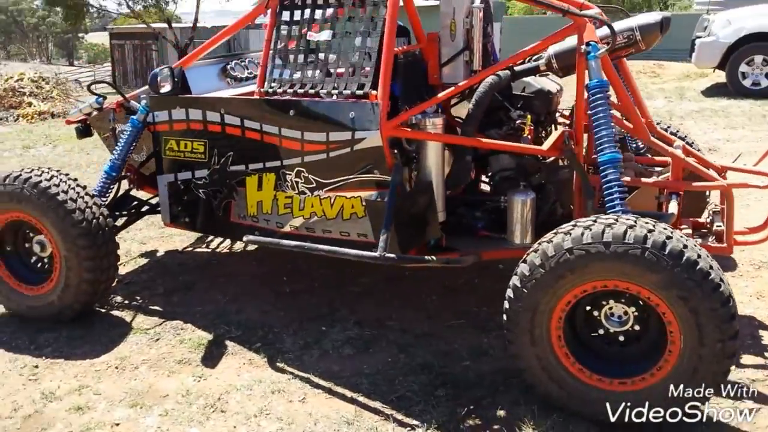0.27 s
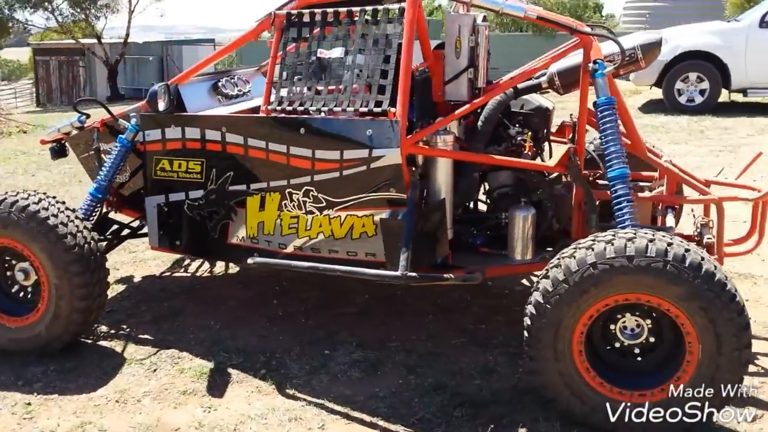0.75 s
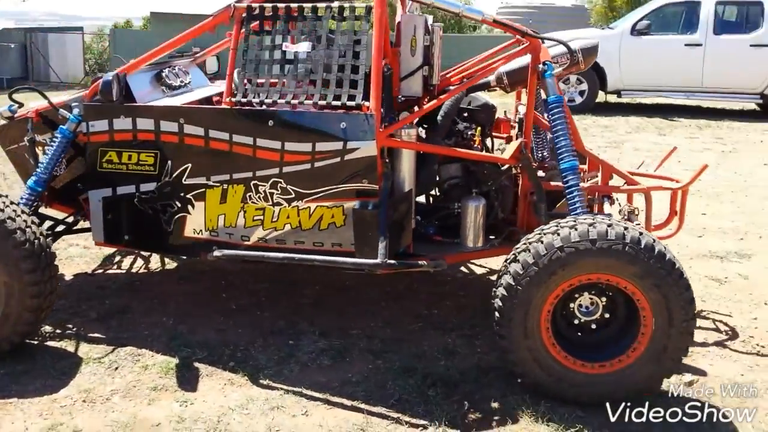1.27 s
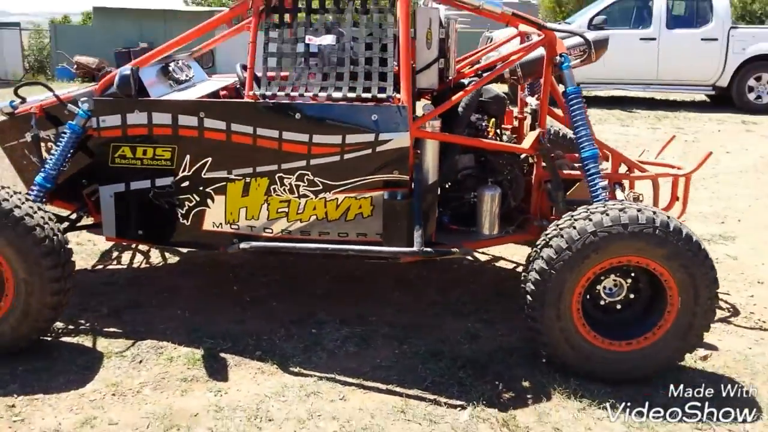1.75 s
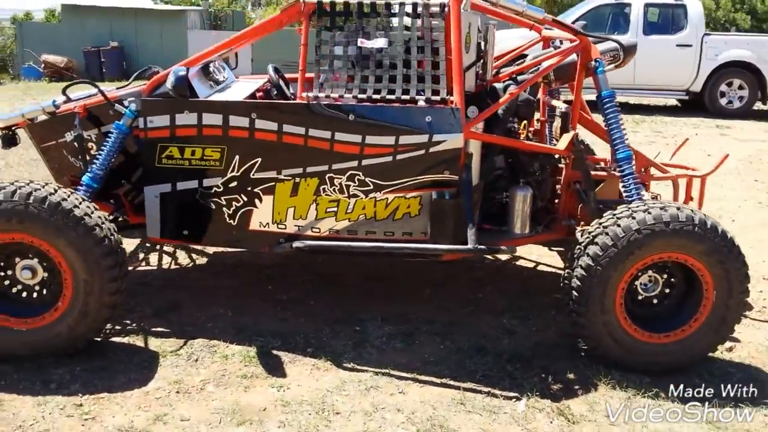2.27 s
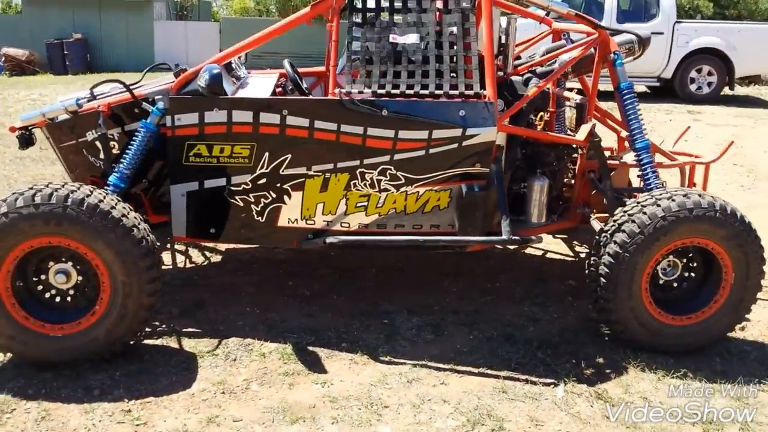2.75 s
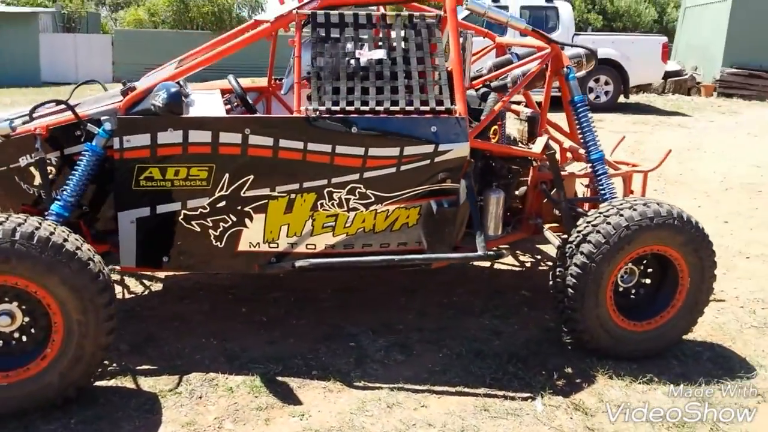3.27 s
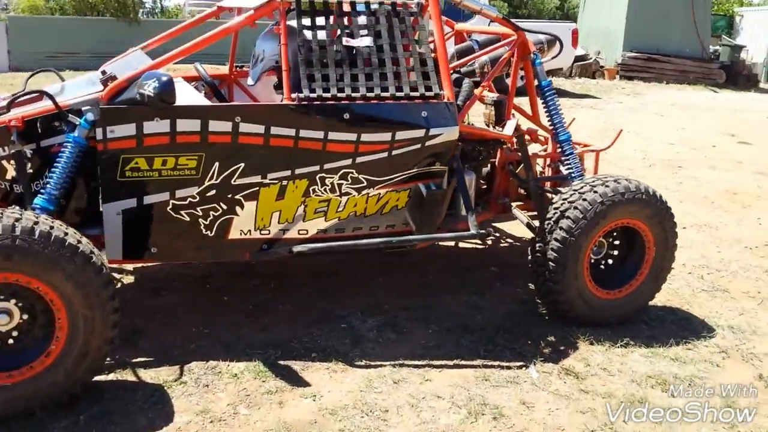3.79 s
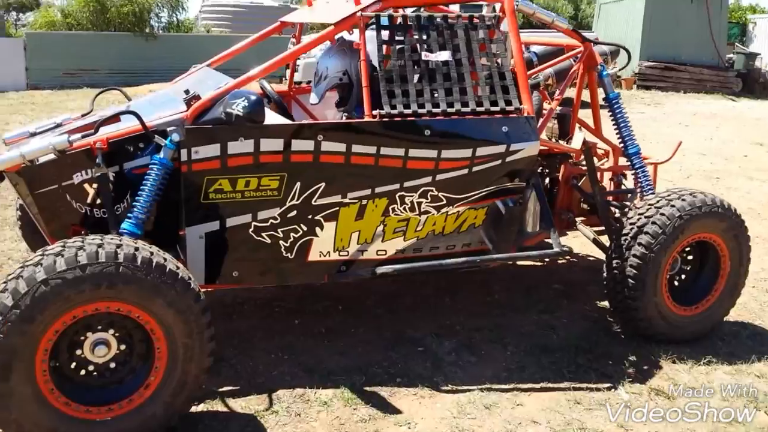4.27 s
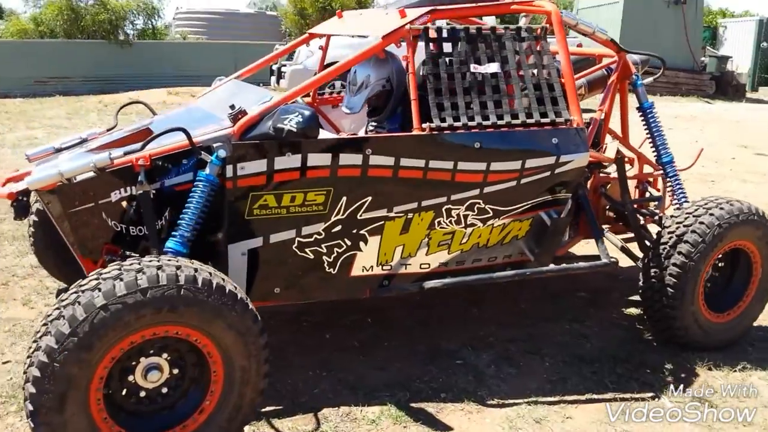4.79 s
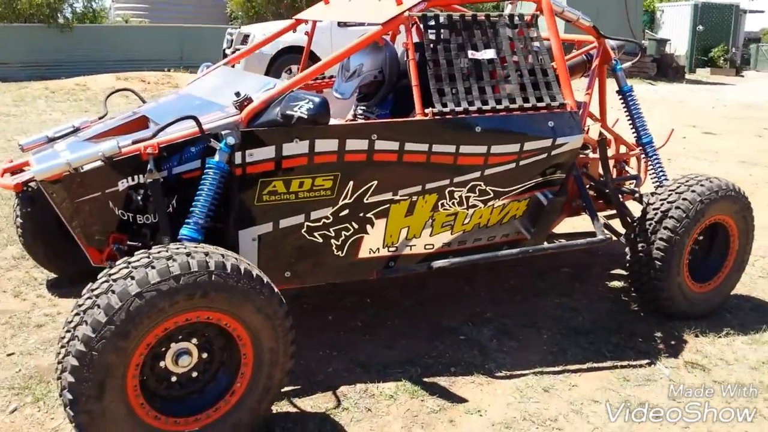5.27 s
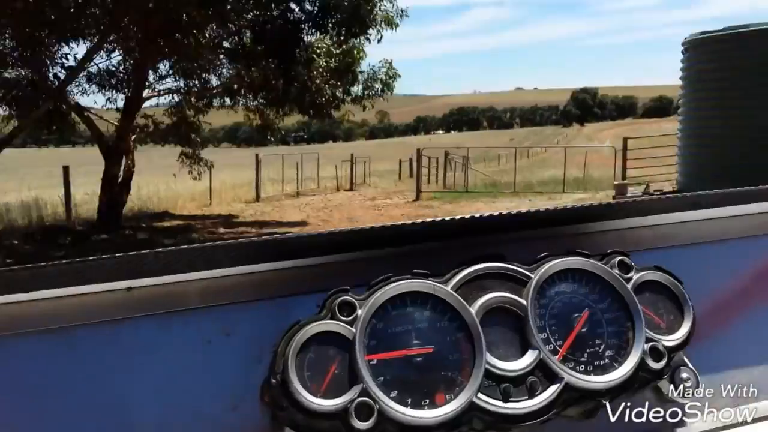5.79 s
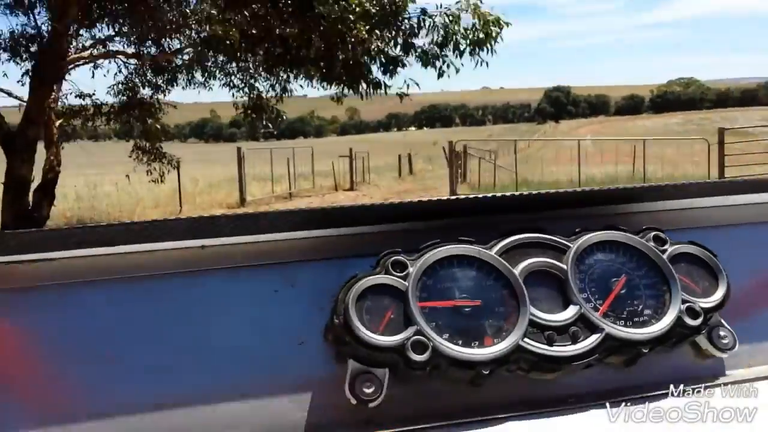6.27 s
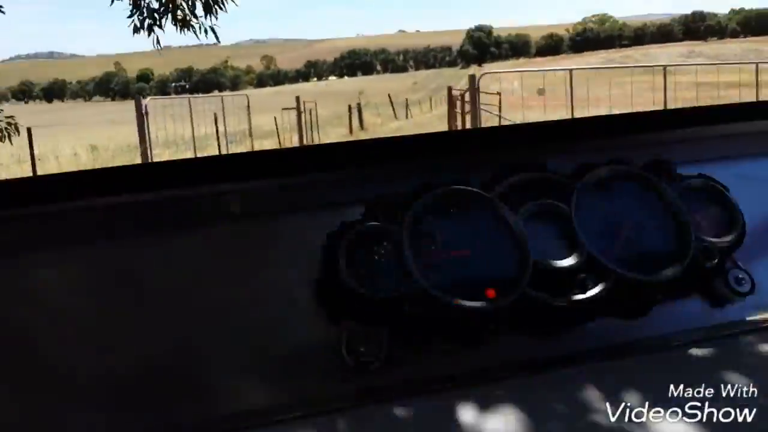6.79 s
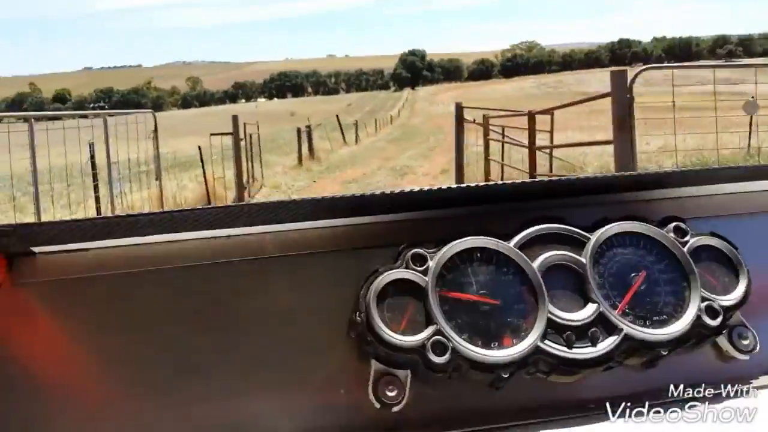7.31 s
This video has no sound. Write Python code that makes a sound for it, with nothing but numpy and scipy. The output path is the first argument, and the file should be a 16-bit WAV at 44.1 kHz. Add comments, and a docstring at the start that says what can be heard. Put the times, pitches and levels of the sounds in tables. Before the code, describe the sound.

A buggy's four-cylinder engine idles in repeated surges with clattering and ticking, then after a brief silence drones and rattles as it pulls away.

```python
"""Buggy idling, then pulling away

On open ground, walking round the car: its four-cylinder motorcycle engine hunts at idle, the exhaust
barking as it catches and only thumping as it sinks. Valve gear clatters, the clutch clacks, an electric
pump ticks, and there are a few short hisses. After a short silence, a microphone pair in the cockpit
as it pulls away: a booming drone, rattling chassis, clinking gear linkage and a singing chain."""
import sys
import numpy as np
from scipy import signal
from scipy.fft import rfft, irfft
from scipy.io import wavfile
from scipy.ndimage import uniform_filter1d

SR = 44100
rng = np.random.default_rng(int(sys.argv[2]) if len(sys.argv) > 2 else 0)


def to_wav(s):
    """Save 16-bit WAV."""
    ch = np.atleast_2d(s).T  # columns
    pcm = np.round(np.clip(ch, -1, 1) * 32767)  # PCM
    wavfile.write(sys.argv[1], SR, pcm.astype(np.int16))


N = 332514
TIME = np.arange(N) / SR
IDLE_END_S, DRIVE_START_S, THROTTLE_S = 5.687, 6.035, 7.14
MID_RATE, CRUISE_RATE = 55, 133  # firings a second
PLATE_DB, PLATE_T60_S = 9, .044  # the clutch plate's ring

# Hisses. Each row: centre in seconds, level in dB, half length in seconds, pitch in Hz, width in octaves.
HISSES = [(1.342, -32.5, 0.071, 6022, 0.17), (1.346, -37.5, 0.062, 8900, 0.25),
          (4.872, -36, 0.026, 6040, 0.65), (5.462, -27.5, 0.018, 6012, 0.38),
          (5.466, -35, 0.021, 8985, 0.301), (6.985, -21, 0.058, 6075, 0.22)]
# The pump, from outside. Each row: time in seconds, level in dB, ring in Hz, casing gain in dB.
PUMP_RUN = [(0, -24, 3650, -1), (.12, -23, 3650, -1), (.19, -18.5, 3650, 0), (.31, -19.5, 3640, 0),
            (.376, -16, 3630, -1), (.46, -24, 3550, -2), (.83, -21.5, 3470, -1), (.895, -17.5, 3450, -1),
            (.96, -22, 3430, -1), (1.15, -25.5, 3350, -2), (2.9, -31, 3190, -4), (4.4, -32, 3240, -8),
            (4.7, -26.5, 3280, -12), (5, -29.5, 3280, -12), (5.7, -34, 3260, -8)]
# The pump's ring. Each row: multiple of its pitch, level in dB, t60 in seconds.
PUMP_MODES = [(0.999, 3, 0.028), (1.04, -8.5, 0.014)]
# Ringing metal parts. Each row: pitch in Hz, level in dB, t60 in seconds.
CASING_MODES = [(4600, -8.5, .02), (4900, 2.5, 0.011)]
CLUTCH_MODES = [(5710, 8.5, .035), (7580, 4, 0.044), (7940, 8.5, 0.027), (8320, 12, .035), (8900, 6, 0.061),
                (9300, -5, .03), (11050, -5.5, .025)]
LINKAGE_MODES = [(4380, -5, .05), (6700, -1, 0.039), (7160, 2, 0.088), (7600, -3, .05), (8000, -4, .07)]
# Loud clutch clacks. Each row: start in seconds, level in dB, lowest ring's gain in dB, plate pitch in Hz.
CLACKS = [(0.4074, -15.5, 1.5, 4900), (0.487, -20.5, 4, 4900), (.554, -17.5, 16, 5800),
          (.618, -19, -9, 4900), (.849, -20, -9, 4900), (0.9533, -17.5, 2.5, 4600), (1.042, -17, 5, 4100),
          (1.119, -17.5, 6, 4900), (1.244, -20.5, 11.5, 5673), (1.5872, -24, -4, 4900),
          (1.6813, -16.5, 26, 4600), (1.758, -19, -9.5, 4900), (1.8249, -20.5, -2, 4900),
          (2.083, -16, 0, 4147), (2.141, -23, -8.5, 4900), (2.236, -21, -5, 4900), (2.7365, -27, -2, 4900),
          (3.008, -22.5, 2, 4900), (3.457, -25, -8, 4900), (3.5464, -20, -8, 4900), (3.684, -20, 8, 4900),
          (3.744, -23, 0, 4900), (4.08, -23, -14, 4900), (4.168, -25.5, -3, 4900), (4.961, -25.5, 1, 4900),
          (5.406, -24.5, 3, 4900), (5.5827, -26.5, 3, 4900), (5.65, -24, -2, 4900)]
# Clatter at mid speed, walking round the car. Each row: time in seconds, block and valve levels in dB.
CLATTER_LEVELS = [(0, -33, -34.5), (1.4, -34.5, -33.5), (3.8, -35, -36), (5.7, -36.5, -40)]
# Colours of the idle, from outside. Each row: frequency in Hz, relative level in dB.
BLOCK_COLOUR = [(250, -20), (520, -0.5), (590, 3), (650, 9.5), (715, 4.5), (800, 1.5), (950, -2),
                (1150, -6.5), (1450, -1.5), (1750, -3.5), (2100, -8), (2800, -11.5), (4000, -21),
                (9000, -65.5), (14000, -58)]
VALVE_COLOUR = [(1000, -40.5), (2300, -1.5), (3100, 0), (4500, 1.5), (5700, -1), (6700, -8), (7500, -8.5),
                (8500, -6.5), (10000, -14.5), (12000, -22), (14000, -65)]
THUMP_COLOUR = [(20, -82.5), (32, -31.5), (45, 4), (60, 0), (78, 3), (97, 8), (118, -1), (145, -13.5),
                (195, -16.5), (240, -20), (400, -31.5), (900, -72), (3500, -100)]
BARK_COLOUR = [(60, -23.5), (140, -31.5), (190, -9.5), (230, -2.5), (270, 2.5), (320, 10), (370, 0),
               (430, -5), (500, -26.5), (650, -30), (1000, -52), (2500, -80), (7000, -95)]
# Lone strokes before the engine catches. Each row: start in seconds, peak in dB.
POPS = [(0.155, -20.5), (.234, -11), (0.259, -12.5), (0.284, -13.5), (.339, -9), (.857, -15), (.880, -9),
        (1.510, -9), (1.539, -21), (2.097, -14.5), (2.119, -11), (2.144, -13), (2.194, -17), (2.217, -11),
        (3.363, -13), (3.411, -12.5), (4.730, -11), (4.782, -11.5), (5.386, -13), (5.412, -11)]
# Surges of the idle. Each row: catch and fuel cut in seconds, slowest and fastest firings a second,
# bow of the climb (1 is straight), bark level in dB, its build in seconds, its swell in dB.
SURGES = [(-0.35, 0.025, 37.4, 70.75, 1.95, -10.5, .05, -1.5),
          (0.34, 0.654, 37.04, 69.08, 0.97, -11, 0.072, -4),
          (0.945, 1.261, 38.58, 71.56, 1.13, -12.5, 0.057, 1.5),
          (1.592, 1.896, 41.08, 70.51, 1.36, -13, 0.038, -1),
          (2.199, 2.528, 41.27, 72.1, 1.07, -14, 0.097, -5),
          (2.838, 3.166, 37.85, 70.9, 1.01, -14.5, 0.082, -1.5),
          (3.428, 3.762, 38.02, 71.3, 1.0, -15, .11, 0.5),
          (4.068, 4.471, 37.9, 72.05, 1.185, -17.5, 0.045, 6.5),
          (4.825, 5.145, 38.1, 70.66, 1.025, -16, 0.071, 4.5),
          (5.451, 5.746, 38.65, 72.3, 1.07, -17.5, .11, -3.5)]

# Colours in the cockpit. Each row: frequency in Hz, relative level in dB.
GRIT_COLOUR = [(4000, -26), (8700, 1.5), (11500, -1), (13000, -9), (15000, -15)]
RUMBLE_COLOUR = [(20, -27), (40, -11), (65, -7.5), (95, -5), (130, -4), (220, -6.5), (600, -62)]
RATTLE_COLOUR = [(900, -24), (1800, -1), (2600, 0), (4000, 0.5), (5500, -2), (7500, -5.5), (8700, -15),
                 (11000, -23), (13000, -26), (15500, -30)]
ROAR_COLOUR = [(300, -28), (450, 6), (540, 3), (630, -5), (760, 3), (980, 1.5), (1200, -3), (1500, -4.5),
               (1900, -8), (2600, -13.5), (5000, -38), (11000, -76)]
RASP_COLOUR = [(90, -39), (150, 10.5), (200, 3), (300, 4.5), (420, 3), (520, -2), (630, -6), (760, -5.5),
               (1000, -14.5), (2000, -36), (6000, -71)]
# Rough ground, from the seat. Each row: time in seconds, rattle level in dB, grit level in dB.
ROUGH_GROUND = [(6.3, -26.5, -39), (6.316, -25.5, -38), (6.61, -28, -38), (6.652, -30, -41),
                (6.878, -28, -37.5), (6.892, -30, -31), (6.916, -28.5, -33.5), (7.064, -28, -33),
                (7.18, -32, -40), (7.238, -27, -31.5), (7.422, -24.5, -27.5), (7.506, -27, -33),
                (7.53, -26, -29)]
# The frame's rumble as it rolls. Each row: time in seconds, level in dB.
RUMBLE_LEVELS = [(6.04, -14.5), (6.24, -28), (6.42, -20), (7.54, -21)]
# Jolts of the frame. Each row: centre in seconds, level in dB, half length in seconds.
JOLTS = [(6.415, -25, 0.026), (6.793, -22, 0.028), (7.535, -15, 0.018)]
# Gear linkage clinks. Each row: start in seconds, peak in dB, level of the lowest ring in dB.
CLINKS = [(6.887, -6, -2), (7.4294, -8, -14)]
# Engine speed pulling away. Each row: time in seconds, firings a second.
DRIVE_RATES = [(6.04, 123), (6.272, 134), (6.54, 121), (6.7, 110), (6.74, 129), (6.796, 125), (6.9, 130.5),
               (7.05, 139.5), (7.126, 125.0), (7.376, 162), (7.476, 140), (7.54, 152)]
# The boom's fundamental. Each row: time in seconds, level in dB.
BOOM_LEVELS = [(6.04, -22), (6.19, -7.5), (6.39, -10.5), (6.45, -25.5), (6.65, -13.5), (6.71, -32),
               (6.94, -8), (7.12, -15.5), (7.17, -26), (7.22, -8.5), (7.39, -10.5), (7.54, -8)]
# The boom's harmonics from the third up. Each entry: level on light throttle in dB.
GROWL_DB = [-35.5, -39, -41, -41, -43]
# Likeness of the noise at the cockpit pair. Each row: frequency in Hz, correlation (below 0 counts as 0).
PAIR_LIKENESS = [(60, -1), (130, 0.9), (290, 0.3), (640, 0.57), (1400, -0.5), (3060, 0), (6730, 0),
                 (14800, -0.2)]
# Balance of the pair. Each row: frequency in Hz, left minus right in dB.
PAIR_BALANCE = [(60, 9), (110, 1), (200, 1), (380, -1), (690, -2.5), (1280, -1.5), (2360, 3), (4350, 3),
                (8020, -10), (14800, -2)]


def amp(db):
    return 10 ** (np.asarray(db) / 20)


def unit_rms(x):
    return x / np.sqrt(np.mean(x ** 2) + 1e-20)


def curves(rows):
    """Each column of a table, joined by straight lines in time."""
    s, *columns = np.transpose(rows)
    return [np.interp(TIME, s, c) for c in columns]


def at_hz(points, hz):
    """A table's value along a log frequency axis."""
    f, value = np.transpose(points)
    return np.interp(np.log(hz + 1), np.log(f + 1), value)


def add(mix, s, sound):
    part = mix[:, max(round(s * SR), 0):][:, :sound.shape[1]]
    part += sound[:, :part.shape[1]]


def swell(centre_s, half_s):
    return np.exp(-.5 * ((TIME - centre_s) / half_s) ** 2)


def wander(hz):
    """Random drift of unit size, up to the given rate."""
    f = np.fft.rfftfreq(N, 1 / SR)
    return unit_rms(irfft(rfft(rng.standard_normal(N)) / (1 + (f / hz) ** 4), N))


def fuzzy_tone(hz, width_hz):
    """Narrow noise around a pitch."""
    drift = wander(width_hz) + 1j * wander(width_hz)
    return (drift * np.exp(2j * np.pi * np.cumsum(hz * np.ones(N)) / SR)).real


def ring_of(points, size=8192):
    """The causal ring of a body with the given spectrum."""
    log_gain = np.log(amp(at_hz(points, abs(np.fft.fftfreq(size, 1 / SR)))))
    return np.fft.ifft(np.exp(np.conj(signal.hilbert(log_gain)))).real[:size // 2]


def colour(x, points):
    return signal.oaconvolve(np.atleast_2d(x), ring_of(points)[None], axes=1)[:, :N]


def pair_noise():
    """White noise at two microphones, partly alike low down and apart in the treble."""
    a, b = rfft(rng.standard_normal((2, N)))
    same = np.clip(at_hz(PAIR_LIKENESS, np.fft.rfftfreq(N, 1 / SR)), 0, 1)
    return irfft(np.array([a, same * a + np.sqrt(1 - same ** 2) * b]), N)


def steady(x, seconds):
    """Holds the running power at one."""
    return x / np.sqrt(abs(uniform_filter1d((x ** 2).mean(0), int(seconds * SR) + 1)) + 1e-12)


def firings(count, cylinders_db, scatter_db, jitter_s):
    """One click at each whole count; the cylinders differ and no two strokes are alike."""
    at = np.flatnonzero(np.diff(np.floor(count)) > 0)
    strength, lag = rng.standard_normal((N // 100, 2))[:len(at)].T
    at = np.clip(at + (lag * jitter_s * SR).astype(int), 0, N - 1)
    out = np.zeros(N)
    out[at] = amp(np.resize(cylinders_db, len(at)) + scatter_db * strength)
    return out


def bursts(clicks, decay_s):
    """Envelope of noise set off by each click."""
    power = signal.lfilter([1], [1, -np.exp(-1 / (decay_s * SR))], clicks ** 2)
    return unit_rms(np.sqrt(abs(power)))


def grains(per_s, spread_db):
    """Random small impacts, a few of them large."""
    return amp(spread_db * np.minimum(rng.exponential(1, N), 4)) * (rng.random(N) < per_s / SR)


def strike(modes, crack, crack_s, vary_db, low_db=0, vary_pitch=.0084, rise_s=.00025):
    """A struck metal part gives a short crack and rings with its modes."""
    t = np.arange(SR // 12) / SR
    hz, db, t60 = np.transpose(modes)[:, :, None]
    phase, size, detune = rng.standard_normal((3, len(modes), 1))
    db = db + vary_db * size + low_db * (hz == hz.min())
    tones = np.sin(2 * np.pi * (hz * (1 + vary_pitch * detune) * t + phase))
    ring = (amp(db) * np.exp(-np.log(1000) * t / t60) * tones).sum(0)
    band = signal.butter(4, [hz.min(), min(hz.max(), SR / 2 - 1000)], "band", fs=SR, output="sos")
    snap = signal.sosfilt(band, rng.standard_normal(len(t))) * np.exp(-t / crack_s)
    out = (unit_rms(ring) + crack * unit_rms(snap)) * (1 - np.exp(-t / rise_s))
    return out[None] / abs(out).max()


def throttled(light_db, more_db, waver_db, rise_s=.1):
    """Gain of a layer that grows as the throttle opens, and wavers a little."""
    throttle = np.clip((TIME - THROTTLE_S) / rise_s, 0, 1)
    return amp(light_db + more_db * throttle + waver_db * wander(20))


def hisses():
    """Short swells of high, narrow noise."""
    f, noise, out = np.fft.rfftfreq(N, 1 / SR), rfft(rng.standard_normal(N)), np.zeros(N)
    for s, db, half_s, hz, octaves in HISSES:
        band = irfft(noise / (1 + (np.log2((f + 1) / hz) / octaves) ** 4), N)
        out += amp(db) * unit_rms(band) * swell(s, half_s)
    return out


def pump(period_s=.0647, jitter_s=.0015, scatter_db=2, return_s=.02, return_db=-4):
    """The plunger ticks at its own steady rate: a stroke, then a softer return."""
    out = np.zeros((1, N))
    db, hz, casing_db = curves(PUMP_RUN)
    for s in np.arange(.053, IDLE_END_S, period_s):
        at = int(s * SR)
        modes = [(multiple * hz[at], level, t60) for multiple, level, t60 in PUMP_MODES]
        modes += [(f, level + casing_db[at], t60) for f, level, t60 in CASING_MODES]
        for delay, softer_db in [(0, 0), (return_s, return_db)]:
            tick = strike(modes, crack=.7, crack_s=.007, vary_db=3, vary_pitch=.01, rise_s=.001)
            size, lag = rng.standard_normal(2)
            tick_db = db[at] + softer_db + scatter_db * min(size, 1) + 1.5
            add(out, s + delay + jitter_s * lag, amp(tick_db) * tick)
    return out


def soft_clacks(count, plate_hz=4900, db=-28.5, db_per_s=-.9, scatter_db=6):
    """Once in each cycle of four firings the clutch clacks softly, unless a loud clack falls there."""
    starts = TIME[np.flatnonzero(np.diff(count // 4) > 0)]
    size = np.minimum(rng.standard_normal(N // 100), 1)
    modes = [(plate_hz, PLATE_DB, PLATE_T60_S)] + CLUTCH_MODES
    clacks = [strike(modes, crack=.8, crack_s=.006, vary_db=3) for _ in range(12)]
    loud_s, out = np.transpose(CLACKS)[0], np.zeros((1, N))
    for k, s in enumerate(starts):
        if abs(loud_s - s).min() > .04:
            add(out, s, amp(db + db_per_s * s + scatter_db * size[k]) * clacks[k % len(clacks)])
    return out


def loud_clacks():
    """Slack in the clutch is taken up with a clack."""
    out = np.zeros((1, N))
    for s, db, low_db, hz in CLACKS:
        modes = [(hz, PLATE_DB, PLATE_T60_S)] + CLUTCH_MODES
        clack = strike(modes, crack=.8, crack_s=.006, vary_db=2.5, low_db=low_db, vary_pitch=.015)
        add(out, s, amp(db + 1.5) * clack)
    return out


def clatter(count, rate, strokes, db_per_octave=4.5):
    """Block and valve gear rattle with the strokes and the gears whirr, louder as the engine speeds up."""
    block_db, valve_db = curves(CLATTER_LEVELS)
    octaves = np.log2(rate / MID_RATE)
    knock, sizzle = rng.standard_normal((2, N))
    block = steady(colour(knock * (.29 + 1.8 * bursts(strokes, .021)), BLOCK_COLOUR), .24)
    taps = firings(2 * count, [.74, -.84, -.16, -2], scatter_db=6, jitter_s=.0019)
    rattle = .52 + .24 * bursts(taps, .0037) + .54 * bursts(grains(per_s=250, spread_db=4.5), .0081)
    valves = steady(colour(sizzle * rattle, VALVE_COLOUR), .21)
    whirr = fuzzy_tone(hz=1580, width_hz=170) * amp(-46 + 12 * octaves)
    metal = block * amp(block_db + 3.5) + valves * amp(valve_db + 2.5)
    return metal * amp(db_per_octave * octaves) + whirr


def chassis(shake):
    """The frame rattles, rumbles and jolts over rough ground; the tyres throw up a fizz of grit."""
    rattle_db, grit_db = curves(ROUGH_GROUND)
    rattle = steady(colour(pair_noise() * shake, RATTLE_COLOUR), .05) * amp(rattle_db + 4.5)
    jolts = sum(amp(db) * swell(s, half_s) for s, db, half_s in JOLTS)
    rumble = unit_rms(colour(pair_noise(), RUMBLE_COLOUR)) * (amp(curves(RUMBLE_LEVELS)[0]) + jolts)
    grit = unit_rms(colour(pair_noise() * shake, GRIT_COLOUR)) * amp(grit_db + 2.5)
    return rattle + rumble + grit


def chain(shake, rate, cruise_hz=6860):
    """Links excite a narrow, wavering ring that rises a little with speed."""
    hz = (cruise_hz + 10 * (rate - CRUISE_RATE)) * (1 + .012 * wander(24.24))
    ring = np.array([fuzzy_tone(hz, width_hz=830) for _ in range(2)])
    return unit_rms(ring * shake) * throttled(-33.5, more_db=7.5, waver_db=1.5)


def linkage(low_hz=4170, low_t60_s=.082):
    """The gear linkage clinks against its stops."""
    out = np.zeros((1, N))
    for s, db, low_db in CLINKS:
        modes = [(low_hz, low_db, low_t60_s)] + LINKAGE_MODES
        add(out, s, amp(db) * strike(modes, crack=.7, crack_s=.008, vary_db=1, vary_pitch=.004))
    return out


def intake(strokes):
    """The intake roars with a gulp of air at each stroke."""
    gulps = .55 * unit_rms(strokes) + pair_noise() * bursts(strokes, .006)
    return steady(colour(gulps, ROAR_COLOUR), .08) * throttled(-24.5, more_db=8, waver_db=.5)


def rasp(strokes, db_per_s=-3):
    """Rough pulses of gas: the rasp eases slowly and steps up as the throttle opens."""
    flow = .55 * unit_rms(strokes) + .83 * pair_noise() * bursts(strokes, .003)
    gain = throttled(-20, more_db=9, waver_db=1) * amp(db_per_s * (TIME - THROTTLE_S))
    return steady(colour(flow, RASP_COLOUR), .19) * gain


def boom(count, rate):
    """Under load the firings merge into a drone whose overtones growl as the throttle opens."""
    second_db = -29 + 20 * np.log2(rate / CRUISE_RATE)
    gains = [amp(curves(BOOM_LEVELS)[0])]
    gains += [throttled(db, more_db=4, waver_db=2.5) for db in [second_db, *GROWL_DB]]
    drone = sum(gain * np.cos(2 * np.pi * k * count + .45 * np.sqrt(k - 1) * wander(20))
                for k, gain in enumerate(gains, 1))
    return np.sqrt(2) * drone * (1 + .08 * wander(35) + .1 * np.cos(np.pi * count))


def cockpit():
    """From the seat, pulling away: the engine drones, and its strokes shake the frame and chain."""
    rate, = curves(DRIVE_RATES)
    count = np.cumsum(rate * (1 + .0059 * wander(25.65))) / SR
    drone = boom(count, rate)
    strokes = firings(count, [2, -2, 1, -1.5], scatter_db=2, jitter_s=.00014)
    engine = drone + rasp(strokes) + intake(strokes)
    shake = .65 + .2 * bursts(strokes, .003) + .4 * bursts(grains(per_s=450, spread_db=2.5), .003)
    return engine + chassis(shake) + chain(shake, rate)


def microphone_pair(x, lead_s=.00006):
    """Each cockpit microphone has its own colour; the left one hears the sound first."""
    f = np.fft.rfftfreq(N, 1 / SR)
    half = amp(at_hz(PAIR_BALANCE, f) / 2) * np.exp(1j * np.pi * f * lead_s)
    return irfft(rfft(x) * np.array([half, 1 / half]), N)


def silencer(drive, hz=190.1, width_hz=58):
    """The silencer's chamber hums at one pitch."""
    b, a = signal.iirpeak(hz, hz / width_hz, fs=SR)
    return unit_rms(signal.lfilter(b, a, signal.lfilter(b, a, drive)))


def puff(ring, pitch):
    """The pipe's ring, shifted by a pitch ratio."""
    steps = np.arange(len(ring))
    return -np.interp(steps * pitch, steps, ring)[None]


def pops():
    """Single strokes fire early and ring the pipe once."""
    out, pop = np.zeros((1, N)), puff(ring_of(BARK_COLOUR), pitch=.9)
    for s, db in POPS:
        add(out, s, amp(db) * pop / abs(pop).max())
    return out


def thump(pulses, gas, rate, strain, db_per_octave=6, strain_db=-5.5):
    """Every stroke pushes a thump out of the pipe; near the top of a climb it gives way to the bark."""
    db = -11 + db_per_octave * np.log2(rate / MID_RATE) + strain_db * strain ** 2
    return steady(colour(.14 * gas - pulses, THUMP_COLOUR), .07) * amp(db + 1.1 * wander(12))


def bark(strokes, rate, bark_db):
    """Each burning stroke rings the pipe; faster, hotter gas rings it higher."""
    creep = .9075 + .019 * TIME
    pitch = creep * (rate / MID_RATE) ** .26 * (1 + .03 * wander(40))
    ring, out = ring_of(BARK_COLOUR), np.zeros((1, N))
    for at in np.flatnonzero(strokes):
        one = puff(ring, pitch[at])
        one *= np.sqrt(SR / rate[at]) / np.linalg.norm(one)  # unit power over one firing
        add(out, at / SR, one * strokes[at] * amp(bark_db[at] - 1.75))
    return out


def hunting(sink_per_s2=185, die_s=.02, coast_db=-11.5):
    """The engine catches and climbs, then the fuel cuts and it runs down to its slowest."""
    catch, cut, slow, fast, bow, db, build, swell_db = np.transpose(SURGES)
    rate, burning, strain = np.full(N, slow[0]), np.zeros(N), np.zeros(N)
    for k in range(len(SURGES)):
        climb = np.interp(TIME, [catch[k], cut[k]], [0, 1])
        rate = np.where(TIME >= catch[k], slow[k] + (fast[k] - slow[k]) * climb ** bow[k], rate)
        dying = np.exp(-np.maximum(TIME - cut[k], 0) / die_s)
        burning += np.sin(np.pi / 2 * np.clip((TIME - catch[k]) / build[k], 0, 1)) * dying
        strain += climb * dying
        if k + 1 < len(SURGES):
            sinking = np.maximum(fast[k] - sink_per_s2 * (TIME - cut[k]), slow[k + 1])
            rate = np.where(TIME >= cut[k], sinking, rate)
    level_db, rise_db = (np.interp(TIME, (catch + cut) / 2, column) for column in (db, swell_db))
    bark_db = level_db + coast_db * (1 - burning) + rise_db * (strain - .5 * burning)
    return rate, burning, bark_db, strain


def idle(header_lag_s=.0003):
    """Beside the car: the pipe thumps and, while fuel burns, barks with a gust of gas and a hum."""
    rate, burning, bark_db, strain = hunting()
    count = np.cumsum(rate) / SR - .05  # firings so far
    alternate = np.cos(np.pi * count)
    # alternate strokes come down headers of unequal length
    arrivals = count + header_lag_s * rate * alternate
    strokes = firings(arrivals, [.5, -.3, .1, -.6], scatter_db=1.3, jitter_s=.00026)
    # strong and weak strokes alternate in spells, and the engine stumbles while it coasts
    lope = 1 + (.05 + .1 * wander(3.9)) * alternate
    lope *= amp((2.2 + .8 * (2.5 - burning)) * wander(22))
    pulses = unit_rms(strokes * lope)
    gas = unit_rms(rng.standard_normal(N) * bursts(strokes, .008))
    gust = unit_rms(colour(gas, BARK_COLOUR)) * amp(bark_db - 14)
    hum = silencer(pulses + .56 * gas) * amp(.64 * bark_db - 11)
    pipe = thump(pulses, gas, rate, strain) + bark(strokes * np.cbrt(abs(lope)), rate, bark_db)
    return pipe + gust + hum + clatter(count, rate, strokes) + soft_clacks(count)


def scene(fade_db=-23.5, fade_s=.13):
    """The idle from outside, a short silence, then the cockpit fades in."""
    fade_out = np.clip((IDLE_END_S - TIME) / .016 + .5, 0, 1)
    since = np.maximum(TIME - DRIVE_START_S, 0)
    fade_in = np.minimum(since / .0028, 1) * amp(fade_db * np.exp(-since / fade_s))
    hiss = hisses()
    outside = idle() + pops() + pump() + loud_clacks() + hiss
    inside = microphone_pair(cockpit() + linkage() + hiss)
    return fade_out * outside + fade_in * inside


def record(dry, limit_db=-10, share=.75, recover_db_per_s=60, edge_hz=15500):
    """A limiter holds the loudest strokes down, peaks are rounded off and the top treble is cut."""
    power_db = 10 * np.log10(abs(uniform_filter1d((dry ** 2).mean(0), size=1300)) + 1e-12)
    fall = TIME * recover_db_per_s
    over_db = np.maximum(np.maximum.accumulate(power_db + fall) - fall - limit_db, 0)
    held = dry / amp(share * uniform_filter1d(over_db, size=400))
    rounded = held / (1 + (abs(held) / 1.05) ** 6) ** (1 / 6)
    lowpass = signal.firwin(511, edge_hz, window=("kaiser", 9), fs=SR)
    return signal.oaconvolve(rounded, lowpass[None], "same")


dry = scene()
out = record(dry)
to_wav(out)
```